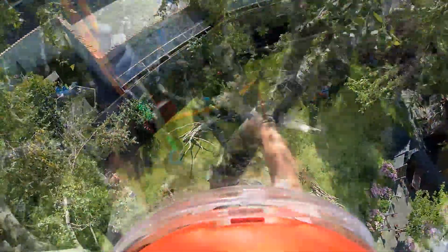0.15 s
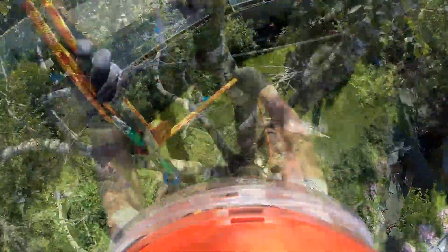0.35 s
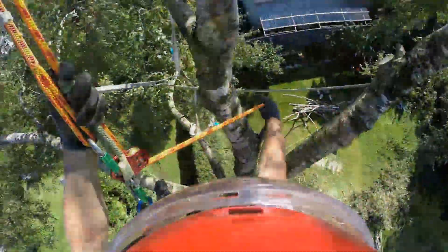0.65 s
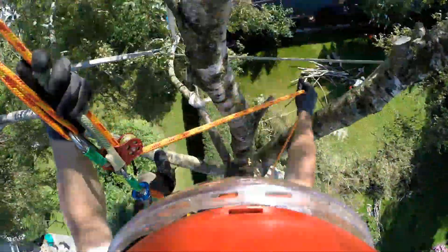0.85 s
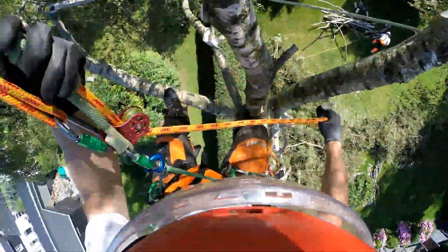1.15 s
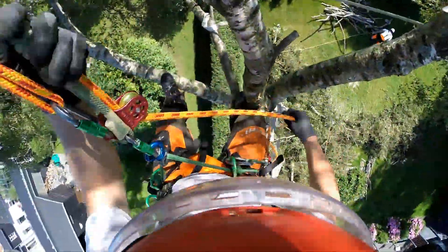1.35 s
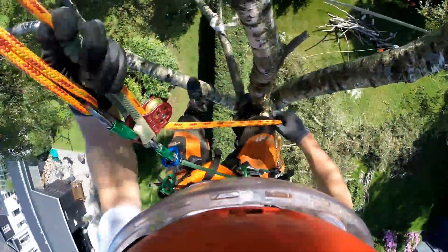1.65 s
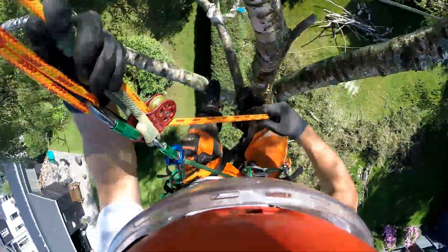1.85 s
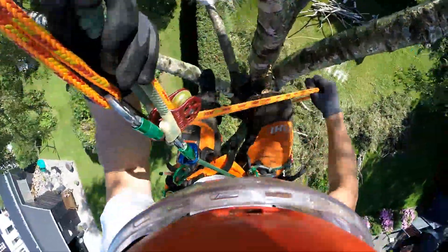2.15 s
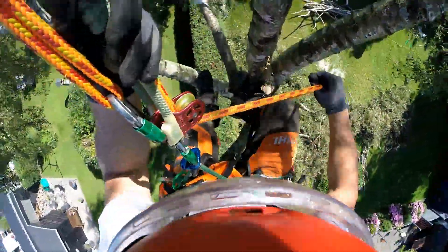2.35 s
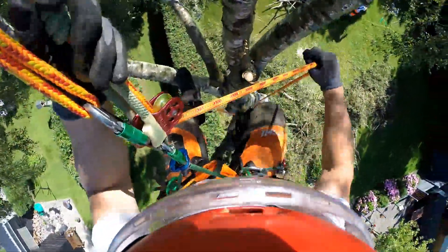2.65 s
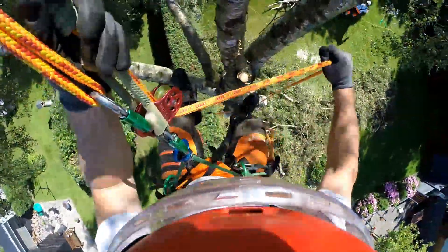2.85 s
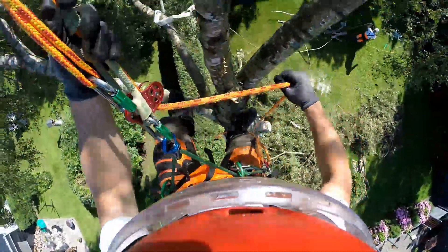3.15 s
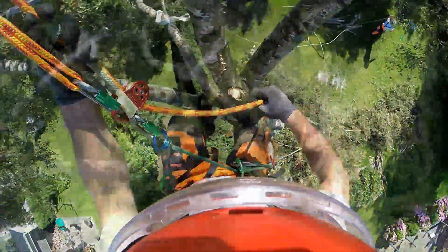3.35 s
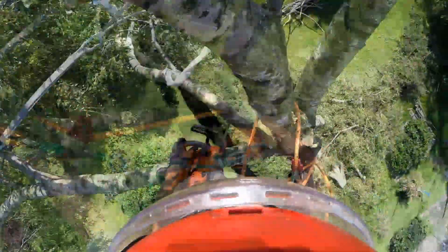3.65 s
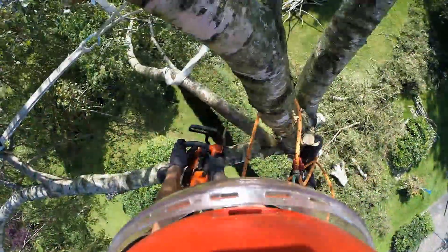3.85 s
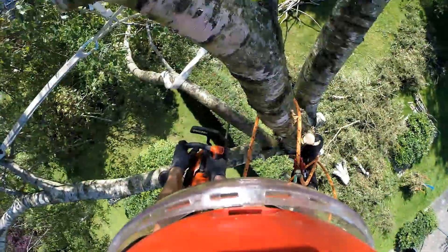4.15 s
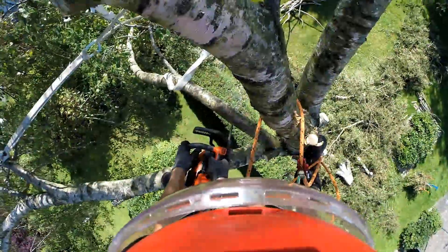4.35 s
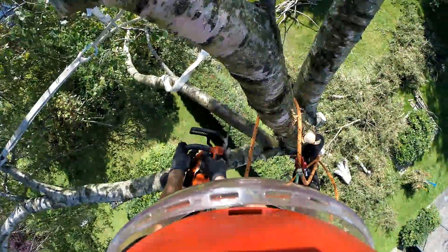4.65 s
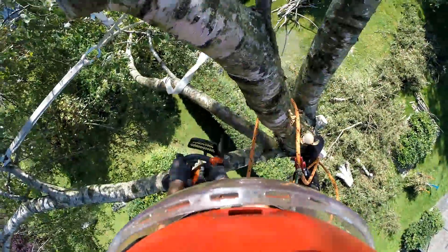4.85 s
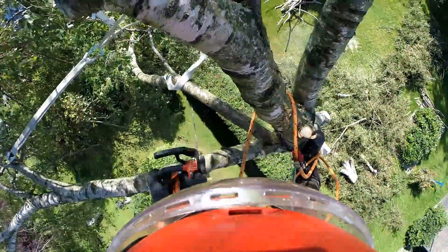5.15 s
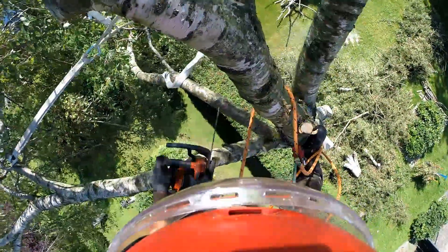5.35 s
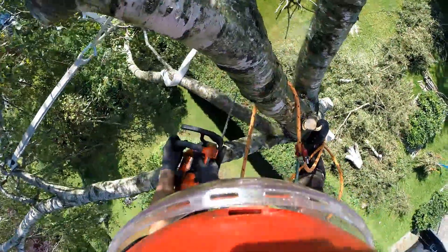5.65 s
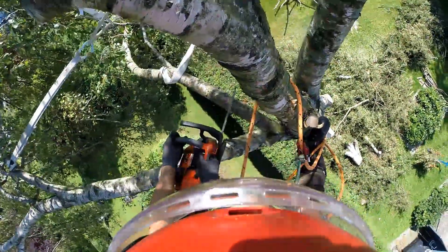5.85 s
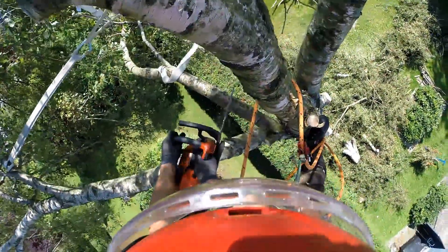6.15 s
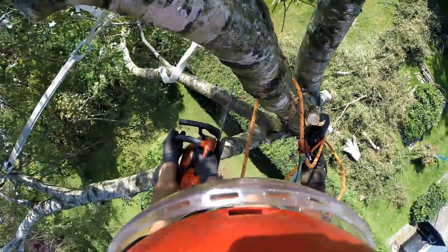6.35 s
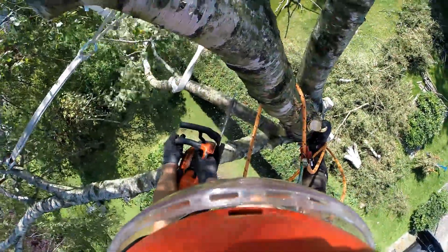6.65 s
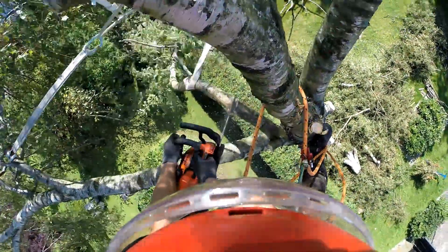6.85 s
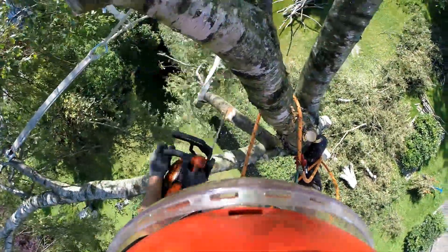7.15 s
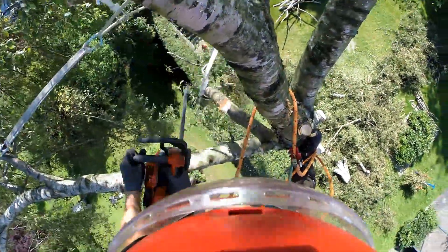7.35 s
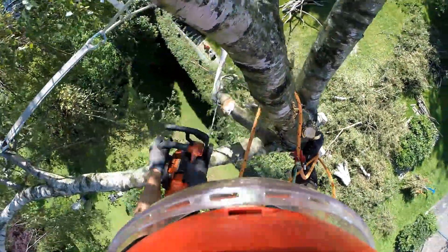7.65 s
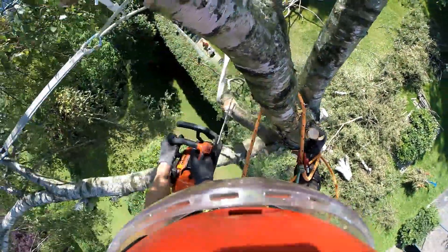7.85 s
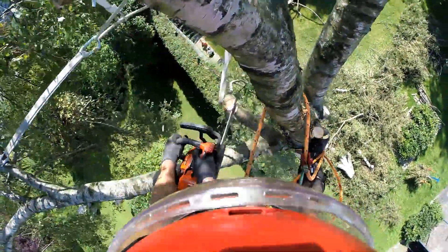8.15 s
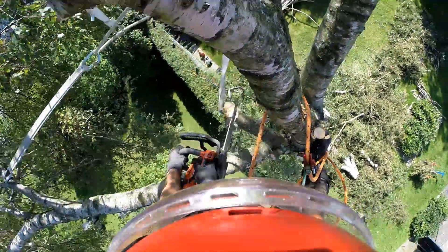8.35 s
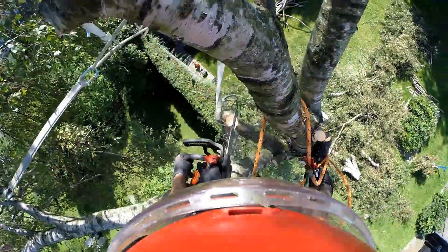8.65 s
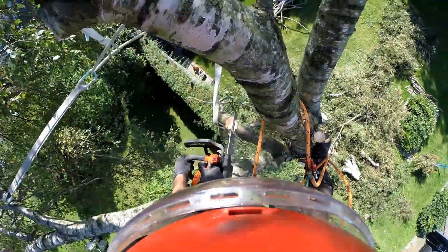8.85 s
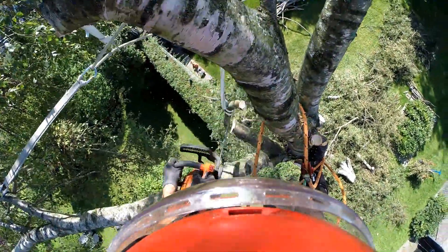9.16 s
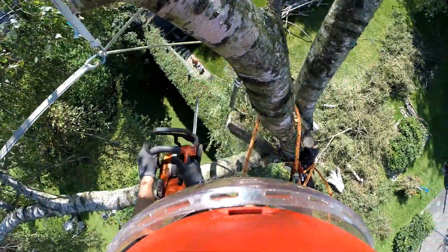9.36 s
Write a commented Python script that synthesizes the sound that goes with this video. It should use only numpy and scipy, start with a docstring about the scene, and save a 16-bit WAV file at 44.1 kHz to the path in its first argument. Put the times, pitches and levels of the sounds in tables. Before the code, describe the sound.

For the first 0.8 seconds a muffled engine idle putters faintly and fades over soft outdoor hush and low microphone rumble. Small metallic clicks of climbing gear come at 0.2 and 0.4, a dull bump at 0.8, and a much louder sharp clack at 1.1. Near-quiet follows, with a low thump at 3.1. From 3.3 a small two-stroke chainsaw fades in close, popping unevenly, and climbs from 3.6 to a loud raspy snarl by 4.3. Released at 4.8, it runs down to a sputter by 5.5. A second pull at 5.7 pops and rises to a steadier buzzing scream until 7.05, then coasts to slow chugging near 7.8. The third pull, from 7.9, surges fastest and highest, slightly labouring around 8.7, before release at 9.2 and a whining, rattling rundown that cuts off at 9.5. Close, dry, centred sound.

```python
"""A small chainsaw revs three times close to a helmet microphone up in a tree, coasting down between bursts.
Crank pulses ring the casing, the exhaust barks on throttle and the chain rattles; lone firings pop at low speed.
Before the saw, a muffled idle further off dies away and climbing gear clicks as short decaying modes.
Behind it all, filtered noise gives an outdoor hush, with a low rumble that rises and falls on the housed microphone."""
import sys
import numpy as np
from scipy import signal
from scipy.fft import rfft, irfft
from scipy.io import wavfile
from scipy.ndimage import uniform_filter1d

SR = 44100
rng = np.random.default_rng(int(sys.argv[2]) if len(sys.argv) > 2 else 0)


def digitize_waveform(pressure):
    """Quantize a signal to 16-bit integers and store it at the path in sys.argv[1].

    Rows of a 2-D input are taken as channels; values are limited to [-1, 1].
    """
    field = np.atleast_2d(pressure).T
    bounded = np.clip(field, -1, 1)
    quanta = np.round(bounded * 32767).astype(np.int16)
    wavfile.write(sys.argv[1], SR, quanta)


def to_linear_factor(level_db):
    """Convert decibel levels (scalar or array-like) to linear amplitude factors."""
    exponent = np.asarray(level_db, float) / 20
    return 10 ** exponent


N = 419811
T = np.arange(N) / SR

# colour of the saw casing: freq_hz, gain_db
CASING = [(30, -47), (70, 13), (180, 2.5), (400, 0.5), (700, -15.5), (1000, -5), (1900, 0.5), (2600, -2.5),
          (4700, -6), (5300, -14), (6000, -21), (8600, -20.5), (11000, -31), (15100, -33.5)]
# resonances (+) and dips (-) of casing, muffler and microphone housing: freq_hz, width_hz, gain_db
RINGS = [(648.2, 42.5, 15), (734, 53.2, -15), (843.1, 26.3, 13.5), (1100, 31.4, 18), (1492.8, 65.5, 8),
         (1647.5, 70, 8.5), (1962.7, 207, 8.5), (2300, 51.1, -28.5), (2574, 82, 9), (2839.6, 86.5, 8.5),
         (3111.8, 54, 8.5), (4186, 96, 5.5), (4774, 83, 5), (5098, 121, 4.5), (5580, 80, 1),
         (6777, 200, -3.5), (6564, 79, 6), (8132, 170, -8.5), (8574, 620, 8), (7284, 136, 5),
         (10290, 238, 7), (11320, 630, 6), (12800, 400, -4.5), (13800, 600, -1.5)]
# crank speed, before a slight wobble: time_s, turns_hz
CRANK_SPEED = [(3.25, 38.06), (3.57, 44.98), (3.67, 82.06), (3.77, 83.9), (3.84, 93.21), (3.89, 88.04),
               (4.05, 119.2), (4.24, 168.4), (4.35, 176.8), (4.63, 170.9), (4.75, 171), (4.78, 181.8),
               (5.1, 105.5), (5.4, 56.02), (5.47, 39.01), (5.67, 40), (5.79, 83.04), (5.9, 105.9),
               (5.96, 101.8), (6.18, 127), (6.39, 169.9), (6.46, 181.9), (6.74, 182.5), (7.04, 190.3),
               (7.11, 162.3), (7.19, 136.4), (7.44, 89.83), (7.65, 57.04), (7.73, 41.98), (7.88, 40.99),
               (7.96, 76.97), (8.12, 128.4), (8.3, 176.6), (8.45, 193.3), (8.59, 204.1), (8.71, 193),
               (9.0, 191.5), (9.15, 210.5), (9.18, 203.6), (9.52, 120)]
SAW_START_S = CRANK_SPEED[0][0]


def level(x, db):
    """Scale to an rms level."""
    return x * to_linear_factor(db) / np.sqrt(np.mean(x ** 2))


def colour(x, points, rings=()):
    """Minimum-phase filter from (Hz, dB) points plus (Hz, width Hz, dB) resonance bumps."""
    f = np.maximum(np.fft.rfftfreq(8192, 1 / SR), 1)
    hz, db = np.transpose(points)
    db = np.interp(np.log(f), np.log(hz), db)
    db = db + sum(d / (1 + (2 * (f - c) / w) ** 2) for c, w, d in rings)
    # folding the cepstrum makes the response causal
    cepstrum = irfft(np.log(to_linear_factor(db)))[:4097]
    cepstrum[1:-1] *= 2
    response = irfft(np.exp(rfft(cepstrum, 8192)))[:4096]
    return signal.fftconvolve(x, response)[:N]


def band(x, lo_hz, hi_hz):
    """Band-pass, rms 1."""
    sos = signal.butter(3, [lo_hz, hi_hz], "band", fs=SR, output="sos")
    return level(signal.sosfilt(sos, x), 0)


def steady(x, span_s=0.061):
    """Hold the short-term rms near 1, ready for a level curve."""
    span = int(span_s * SR)
    power = uniform_filter1d(uniform_filter1d(x ** 2, span), span)
    return x / np.sqrt(power + 1e-12)


def walk(rate):
    """Random levels of rms near 1, held 1 / rate s and slewed twice."""
    k = int(SR / rate)
    held = np.repeat(rng.standard_normal(N // k + 1), k)
    return 1.3007 * uniform_filter1d(uniform_filter1d(held, k), k)[:N]


def ring(s, modes, peak_db, rough=0.):
    """One blow on decaying (Hz, dB, t60 s) modes, as a full-length track; rough smears each mode."""
    t = np.arange(min(SR // 2, N - int(s * SR))) / SR
    y = 0
    for f, d, t60 in modes:
        shake = walk(300)[:len(t)]
        phase = rough * (shake + rng.uniform(0, 9.13))
        y = y + to_linear_factor(d - 60 * t / t60) * np.sin(2 * np.pi * f * t + phase)
    y = y * np.minimum(t / 0.000266, 1)  # soft onset
    out = np.zeros(N)
    out[int(s * SR):int(s * SR) + len(t)] = y * to_linear_factor(peak_db) / np.abs(y).max()
    return out


def saw(hz, throttle, lock, thump_db, bark_db, chain_db, hiss_db):
    """Crank tone, exhaust bark and chain noise, driven by each turn and coloured mostly by one casing."""
    # weight of the crank thump: freq_hz, gain_db
    thump_colour = [(40, -17.5), (90, -10.5), (190, 8.5), (380, 5.5), (600, 15.5), (800, 3.5),
                    (1500, -65.5)]
    wobble = 0.002981  # depth of speed wobble, as a share of speed
    puff_s, bed = 0.00586, 0.765  # decay of each puff, steady gas flow beneath it
    grit_db, flicker_db = 2.0, 0.13  # chain unevenness: sample by sample, and slow
    scatter_db = 2.2  # spread of knock strength from turn to turn
    skip_db, skip_ends_hz = -8, 165  # below this speed every other turn knocks weakly
    ring_share = 0.672  # how strongly the casing resonances shape the crank tone

    turns = np.cumsum(hz * (1 + wobble * walk(60))) / SR
    turn = turns.astype(int)
    since_s = turns % 1 / hz

    # every firing has its own strength, most uneven when the engine runs rough
    size = to_linear_factor(3.5 * (1 - lock) * rng.standard_normal(N // 100)[turn])
    puff = bed + 0.294 * (1 - throttle) + size * np.exp(-since_s / puff_s)

    # lock shares the power between what repeats every turn and loose gas noise
    tone_rings = [(f, w, ring_share * d) for f, w, d in RINGS]
    tone = np.sqrt(lock) * colour(crank(turns, hz, throttle), CASING, tone_rings)
    gas = level(rng.standard_normal(N) * puff * to_linear_factor(2.0 * walk(30)), 0)
    gas = colour(np.sqrt(1 - lock) * gas, CASING, RINGS)

    grit = np.minimum(rng.exponential(1, N), 4)
    links = rng.standard_normal(N) * to_linear_factor(grit_db * grit + flicker_db * walk(40)) * puff ** 0.503
    links = colour(level(links, 0), CASING, RINGS)

    # loose firings knock hardest while the throttle is open and little repeats
    scatter = scatter_db * rng.standard_normal(N // 100)[turn]
    skip = skip_db * (turn % 2) * (hz < skip_ends_hz)
    knock = 0.865 * throttle * (1 - lock) * muffler(turn, to_linear_factor(scatter + skip))

    # each part keeps its own overall strength through the band-pass
    bark = band(tone, 616, 2366) * np.std(tone)
    bark = bark + 1.105 * band(gas, 951, 2241) * np.std(gas)
    bark = bark + band(knock, 698, 2193) * np.std(knock)
    rattle = band(0.713 * tone + 0.685 * gas + 0.78 * knock + 0.718 * links, 2242.6, 5130)
    thump = colour(tone + 0.204 * gas, thump_colour)
    hiss = band(links, 5527, 14270)

    out = to_linear_factor(thump_db) * steady(thump)
    out = out + to_linear_factor(bark_db) * steady(bark, span_s=0.0375)
    out = out + to_linear_factor(chain_db) * steady(rattle, span_s=0.123)
    out = out + to_linear_factor(hiss_db) * steady(hiss, span_s=0.1)
    return out * np.clip((T - SAW_START_S) / 0.044, 0, 1)


def controls():
    """Crank speed, throttle, and the layer levels and repeat share that follow from them."""
    # trigger pulls: squeezed_s, released_s, share of the bark repeating every turn at full speed (0-1)
    pulls = [(3.56, 4.8, .33), (5.659, 7.058, .53), (7.885, 9.175, .68)]
    # speed laws, throttle open, ahead of the level and treble curves: crank_hz, crank_thump_db,
    # exhaust_bark_db, chain_rattle_db, treble_hiss_db, shudder_db, part of the full repeat share (0-1)
    driven = [(40, -46, -42, -39.5, -53.5, -51, 0.1), (73.74, -39.5, -32, -35, -45.5, -49.5, 0.67),
              (114.85, -30.5, -22.5, -22.5, -33.5, -39, 0.36), (150.3, -31, -18.5, -18.5, -27.5, -40, 0.58),
              (179.7, -31.5, -19, -16.5, -26, -50.5, 1), (204.7, -34, -19.5, -15.5, -26.5, -52, 0.95)]
    # the same columns with the throttle shut
    coasting = [(40, -47, -40.5, -38.5, -50.5, -54, 0.054), (59.3, -46, -38.5, -32.5, -42, -59, 0.57),
                (90.3, -42, -33.5, -28, -36.5, -59.5, 0.74), (120, -41, -29.5, -24.5, -34, -56.5, 0.73),
                (162.2, -42, -24.5, -20, -30, -59, 0.704), (207.3, -40, -22, -19, -28.5, -59.5, 0.67)]
    # level of the whole saw, which fades in and dips as the bar digs into wood: time_s, gain_db
    saw_level = [(3.25, -25), (3.45, -13.5), (3.65, -5.5), (3.75, -1.5), (3.9, .5), (4.05, -.5),
                 (4.3, -0.5), (4.78, 0), (5.0, -1), (5.14, 1), (5.4, -0.5), (5.66, -1.5), (5.9, 1),
                 (6.3, 0.5), (6.62, 1), (6.69, -3), (6.83, -1), (7.1, 0), (7.5, 0.5), (7.9, 0), (8.24, 1.5),
                 (8.6, 0.5), (8.8, -1.5), (9.15, -0.5), (9.24, -2), (9.36, 0), (9.52, -1.5)]
    # rattle and hiss relative to their speed laws: time_s, rattle_db, hiss_db
    treble = [(3.3, 3, -2), (3.6, 0, -1.5), (3.9, -1, -2.5), (4.8, 1.5, 0), (5.15, -1.5, -.5), (5.7, 1, 0),
              (6.1, 0, 0), (6.6, -1, .5), (7.1, -.5, .5), (7.6, 0, 1.5), (8.1, 0, 0), (8.6, 1, 0),
              (9.15, -1, -1), (9.35, 1.5, .5), (9.52, 2, 2)]
    trigger_s = 0.03  # throttle travel

    hz = np.interp(T, *np.transpose(CRANK_SPEED))
    throttle = sum(np.clip(np.minimum(T - on, off - T) / trigger_s + .5, 0, 1) for on, off, _ in pulls)

    def law(rows):
        speed, *columns = np.transpose(rows)
        return np.array([np.interp(hz, speed, column) for column in columns])

    *dbs, part = throttle * law(driven) + (1 - throttle) * law(coasting)
    on, _, share = np.transpose(pulls)
    latest_pull = np.maximum(np.searchsorted(on, T) - 1, 0)
    lock = np.clip(part * share[latest_pull], 0, 1)
    at, rattle_db, hiss_db = np.transpose(treble)
    dbs[2] = dbs[2] + np.interp(T, at, rattle_db)
    dbs[3] = dbs[3] + np.interp(T, at, hiss_db)
    return hz, throttle, lock, np.array(dbs) + np.interp(T, *np.transpose(saw_level))


def crank(turns, hz, throttle):
    """What repeats every turn: harmonics whose levels depend on the cut, the throttle and the speed."""
    # one turn at working speed, throttle open: multiple of crank speed (rounded when sounded),
    # cut_1_db, cut_2_db, cut_3_db, cut_4_db
    shape = [(1, 6.5, 4.5, -4, -6.5), (2, 7, 1, -5, -7), (3, 5, -1.5, -8, -9), (3.97, 2, 0.5, -0.5, 2.5),
             (5.06, 16, 17.5, 9, 5.5), (6, -13.5, -1.5, 0, 1.5), (7, 7, 0.5, -1, -2.5), (8, 8, 4, 2, -3.5),
             (9.07, -1.5, 7.5, -3, 7.5), (10, -6.5, -14, 6, -1), (11, 6, -9.5, 2, 2.5),
             (12, 12.5, 8, 5.5, 5), (13, 9, -6.5, -1, -1.5), (14, -14, -9, -1.5, -5), (15, 3, -1.5, 1, 6),
             (16, 10, -2.5, -1, -2), (17, 4, -10.5, -4, -11.5), (18, 8, 3, -0.5, -6.5), (19, -8, -2, -6, 0),
             (20, 5, -3, -0.5, -5), (21, 2.5, -2, -11.5, -5), (22, 1, -1.5, -1.5, -3), (23, 2, -5, -8, -2),
             (24, 0.5, -4.5, -9.5, 3.5), (25, 4.5, -5, -3, -3), (26, -15, 5, -14, 2)]
    # where each next cut's shape begins: start_s
    cut_starts = [5.6, 7.85, 8.68]
    # smooth shapes outside the cut: multiple of crank speed, speeding_up_db, coasting_db
    free_shape = [(1, 3.5, 0.5), (3, 3.5, 0), (7.94, 7.5, 0.5), (9.92, -2.5, 0), (26.1, -3, -4)]
    drift_db = 2.0  # slow wander of each harmonic, throttle open
    full_hz, ease_hz = 150, 25  # centre and width of the passage to working speed
    whine_at, whine_width, whine_db = 17.5, 1, 6  # coasting whine: multiple, width in multiples, dB
    coast_bass_db = 5  # the fundamental stands out while coasting fast

    cut = np.searchsorted(cut_starts, T)
    full = np.clip((hz - full_hz) / ease_hz + .5, 0, 1)  # 0 at low speed, 1 at working speed
    at, *free = np.transpose(free_shape)
    out = 0
    for k, *cut_db in shape:
        rise_db, coast_db = (np.interp(k, at, c) for c in free)
        whine = whine_db * np.exp(-((k - whine_at) / whine_width) ** 2)
        coast_db = coast_db + full * (whine + coast_bass_db * (round(k) == 1))
        working_db = uniform_filter1d(np.array(cut_db, float)[cut], SR // 8)
        driven_db = full * working_db + (1 - full) * rise_db
        # the harmonics flare more when coasting
        drift = drift_db * (1 + 1.24 * (1 - throttle)) * walk(12)
        db = throttle * driven_db + (1 - throttle) * coast_db + drift
        out = out + to_linear_factor(db) * np.cos(2 * np.pi * round(k) * turns + rng.uniform(-1.92, 1))
    return level(out, 0)


def muffler(turn, size):
    """Each firing strikes the muffler's modes with a ragged burst of gas."""
    # muffler modes: freq_hz, gain_db, t60_s
    modes = [(1590, -3, 0.0464), (1786, 6.5, 0.0384), (1906, -4, 0.0205), (2575, -13, 0.034),
             (4568, -3.5, 0.0248)]
    burst_s = 0.00189  # decay of each burst
    strikes = np.diff(turn, prepend=0) * size
    burst = signal.lfilter([1], [1, -np.exp(-1 / (burst_s * SR))], strikes)
    blows = burst * (.5 + rng.standard_normal(N))
    t = np.arange(SR // 20) / SR
    body = sum(to_linear_factor(d - 60 * t / t60) * np.sin(2 * np.pi * f * t) for f, d, t60 in modes)
    return steady(signal.fftconvolve(blows, body)[:N], span_s=0.099)


def bite(shudder_db):
    """Low uneven shudder while the engine pulls up, and jolts, as noise with one casing resonance and the dip
    just above it."""
    # jolts when the chain bites or the trigger is let go: time_s, peak rms level_db,
    # s to fall 15 dB either side
    jolt_times = [(4.78, -34.5, 0.0734), (6.8, -40.5, 0.1444), (7.05, -39.5, 0.01), (8.65, -36, 0.1521),
                  (8.9, -47.5, 0.18), (9.16, -35.5, 0.0568)]
    shake = rng.standard_normal(N) * to_linear_factor(2.55 * walk(50))
    shake_colour = [(60, -11.5), (120, -7.0), (500, 2.5), (680, -2.5), (1000, -5.5), (2000, -41)]  # Hz, dB
    shake = colour(shake, shake_colour, RINGS[:2])
    jolts = sum(to_linear_factor(db - 15 * np.abs(T - s) / fall_s) for s, db, fall_s in jolt_times)
    return level(shake, 0) * (to_linear_factor(shudder_db) * (T > SAW_START_S) + jolts)


def pops():
    """Single firings: short gas bursts through the same casing, with a thud below and a hiss above."""
    # lone firings at low speed, levels ahead of a 2 dB cut: start_s, level_db
    firings = [(3.308, -37), (3.388, -36), (3.467, -30), (3.568, -26.5), (3.619, -24.5), (3.649, -28),
               (3.678, -21), (3.734, -19.5), (3.939, -11.5), (3.989, -12), (5.516, -19.5), (5.611, -25),
               (5.674, -19.5), (5.71, -18), (5.741, -14.5), (5.765, -14.5), (5.792, -15.5), (5.839, -20),
               (5.957, -14), (7.761, -18.5), (7.88, -18), (7.917, -17.5), (7.949, -13), (7.975, -15),
               (7.999, -11)]
    t60_s, rise_s = 0.02905, 0.00155
    thud_db, hiss_db = -14, -16  # relative to the middle band
    puffs = np.zeros(N)
    t = np.arange(SR // 10) / SR
    for s, db in firings:
        puffs[int(s * SR):int(s * SR) + len(t)] += to_linear_factor(db - 60 * t / t60_s) * np.minimum(t / rise_s, 1)
    gas = colour(rng.standard_normal(N), CASING, RINGS)
    burst = band(gas, 617, 7430)
    burst = burst + to_linear_factor(thud_db) * band(gas, 122, 590)
    burst = burst + to_linear_factor(hiss_db) * band(gas, 6800, 13400)
    return to_linear_factor(-2) * puffs * burst


def idle():
    """Muffled firings strike decaying modes over a hum of noise with the same resonances, dying away."""
    # firings of the idle further off: start_s, peak_db
    firings = [(0.0618, -28.5), (0.142, -34), (0.183, -34.5), (0.2426, -42), (0.3047, -35.5), (0.3663, -36),
               (0.4236, -39.5), (0.4853, -39.5), (0.591, -45.5), (0.7387, -48)]
    # modes each firing rings: freq_hz, gain_db, t60_s
    modes = [(1100, -5.5, .07), (1343, 4.5, 0.0436), (1506, -12.5, .04), (1992, -0.5, 0.067),
             (2560, -3.5, 0.069), (3105, -23, .04)]
    # fade of the hum, ahead of a 1.7 dB cut: time_s, level_db
    hum_fade = [(0, -46), (.08, -47), (.5, -56.5), (.8, -68.5)]
    hum_colour = [(100, -17.5), (200, 5.5), (600, -2.5), (3000, -8), (3800, -30)]  # Hz, dB
    hum = colour(rng.standard_normal(N), hum_colour, [(f, 150, 7) for f, _, _ in modes])
    fade = to_linear_factor(np.interp(T, *np.transpose(hum_fade), right=-120))
    return level(hum, -1.7) * fade + sum(ring(s, modes, db, rough=0.582) for s, db in firings)


def gear():
    """Clips and rope hardware: each blow favours the modes near its brightness and cracks around it."""
    # gear clicks, peak of the ringing part: start_s, peak_db, brightness_hz, spread in octaves
    clicks = [(0.232, -30.5, 4300, 0.117), (0.36, -27, 4300, 0.221), (.817, -34, 1183, 0.44),
              (.905, -49.5, 1100, .1), (.935, -49.5, 1100, .1), (1.008, -42, 4300, 0.172),
              (1.069, -38, 2300, 1.07), (1.129, -13, 2463, 0.816)]
    # modes of the hardware: freq_hz, gain_db, t60_s
    hardware = [(1096, 6, 0.064), (1373, -4.5, 0.048), (1926, 3, 0.068), (2676, 8, 0.0196),
                (3118, 6.5, 0.0336), (3780, -15.5, .025), (4300, -1, 0.0099), (5020, -6, 0.013),
                (5712, -0.5, 0.031), (7500, -18, .02)]
    # bumps on the housing: start_s, peak_db, freq_hz, t60_s
    bumps = [(.815, -32.5, 138.1, 0.286), (.9, -35.5, 118.7, 0.148), (3.073, -27, 35.6, 0.46)]
    crack_db, crack_t60_s = -6, 0.026  # noise crack, relative to the click's peak
    out = sum(ring(s, [(hz, 0, t60)], db) for s, db, hz, t60 in bumps)
    for s, db, hz, spread in clicks:
        modes = [(f, d - 6 * (np.log2(f / hz) / spread) ** 2, t60) for f, d, t60 in hardware]
        crack = band(rng.standard_normal(N), hz / 2 ** spread, hz * 2 ** spread)
        fade = to_linear_factor(db + crack_db - 60 * np.maximum(T - s, 0) / crack_t60_s)
        fade = fade * np.clip((T - s) / 0.00067, 0, 1)
        out = out + ring(s, modes, db, rough=1.207) + crack * fade
    return out


def air():
    """Outdoor hush of filtered noise with a low rumble and a thin hiss; the treble flickers."""
    # relative colour of the hush: freq_hz, gain_db
    hush_colour = [(12, -48.5), (20, 3.5), (45, -7), (70, -18.5), (156, -19.5), (189, -21.5), (527, -28.5),
                   (1390, -33.5), (1880, -33.5), (2160, -34.5), (3190, -33.5), (5710, -46), (8190, -40),
                   (9410, -46), (15100, -50.5)]
    # gain of the low rumble below 60 Hz, its rises and falls partly chance: time_s, gain_db
    rumble_gain = [(0, 4.5), (3.4, 3.5), (4.1, -7.5), (4.75, 8), (5.1, -8.5), (9.52, 3)]
    # thin hiss near 5 kHz: time_s, level_db
    thin_level = [(0, -63.5), (.62, -65), (.66, -73), (1.5, -72), (3.3, -69)]
    hush = colour(rng.standard_normal(N), hush_colour, [(23.8, 7.15, -6.5), (35.1, 4.9, 1.55)])
    hush = level(hush, -49.5)
    low = signal.sosfilt(signal.butter(2, 60, "low", fs=SR, output="sos"), hush)
    high = signal.sosfilt(signal.butter(2, [6300, 9500], "band", fs=SR, output="sos"), hush)
    # faint regular ticking, about 60 a second
    flicker = to_linear_factor(5 * np.cos(2 * np.pi * 59.94 * T) * (1 + .5 * walk(8)) + walk(40))
    rumble = to_linear_factor(np.interp(T, *np.transpose(rumble_gain)))
    thin = band(rng.standard_normal(N), 4834, 5133) * to_linear_factor(np.interp(T, *np.transpose(thin_level)))
    return hush + low * (rumble - 1) + high * (flicker - 1) + thin


def scene():
    """All sources reach one microphone, heard alike on both channels."""
    hz, throttle, lock, (*saw_db, shudder_db) = controls()
    mono = saw(hz, throttle, lock, *saw_db) + bite(shudder_db) + pops() + idle() + gear() + air()
    return np.array([mono, mono])


def top_cut(x):
    """Nothing passes above the cut-off."""
    return signal.sosfilt(signal.butter(12, 15220, fs=SR, output="sos"), x)


def record(dry):
    """The recorder rounds the highest peaks."""
    mix = np.tanh(dry / 1.25) * 1.3036
    return top_cut(mix)


dry = scene()
out = record(dry)
digitize_waveform(out)
```